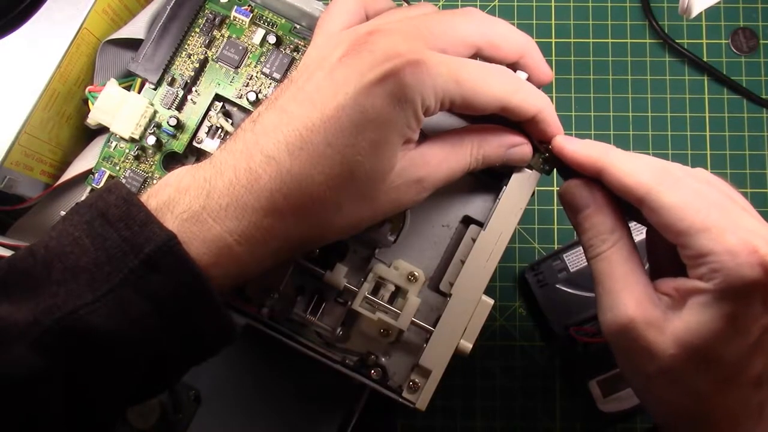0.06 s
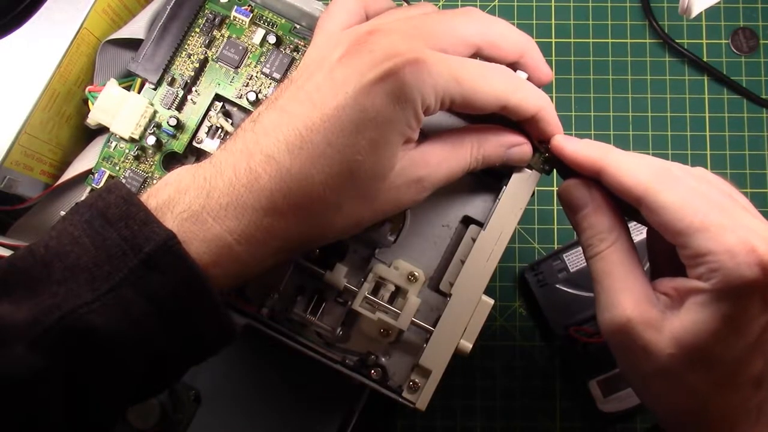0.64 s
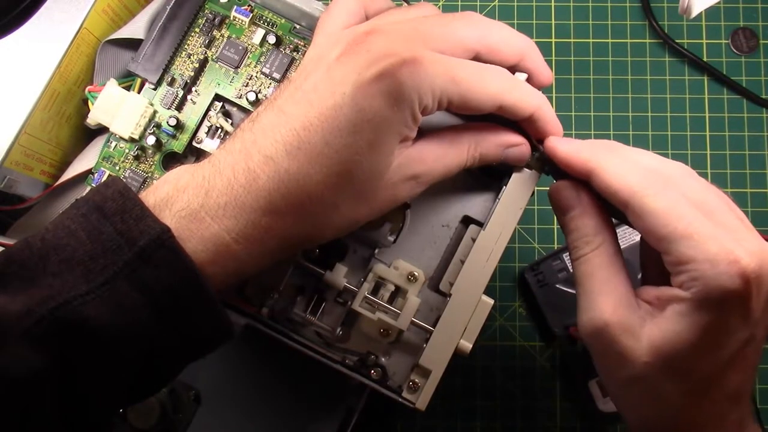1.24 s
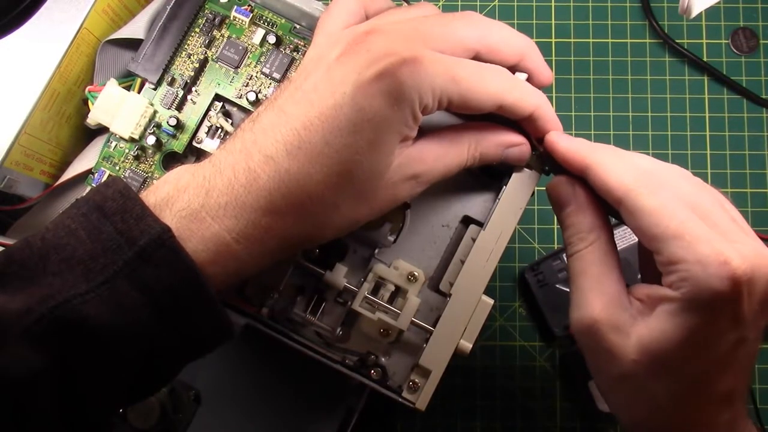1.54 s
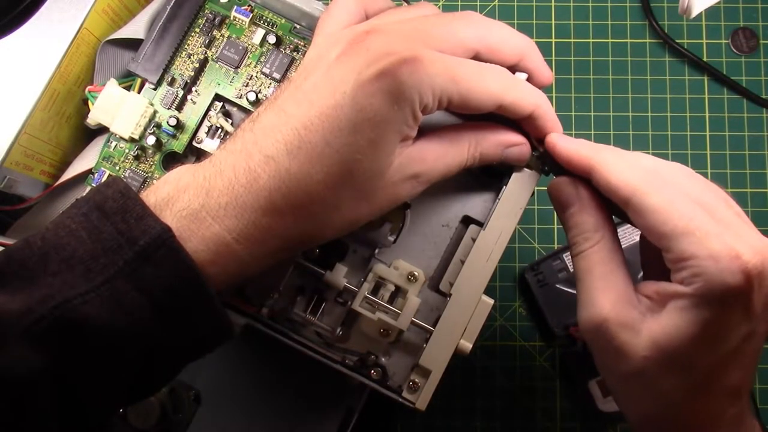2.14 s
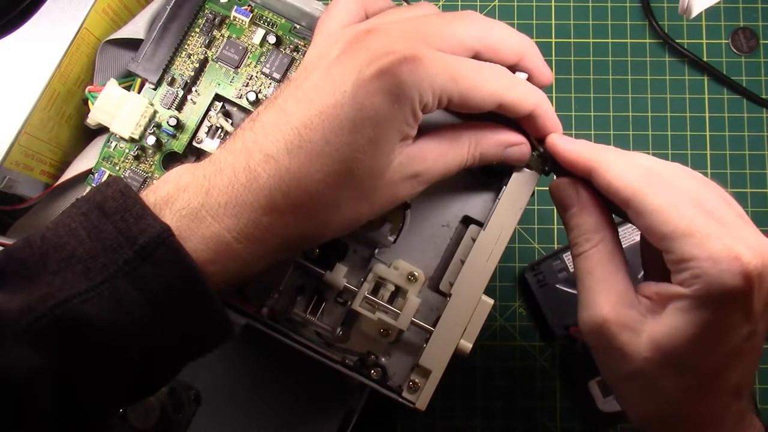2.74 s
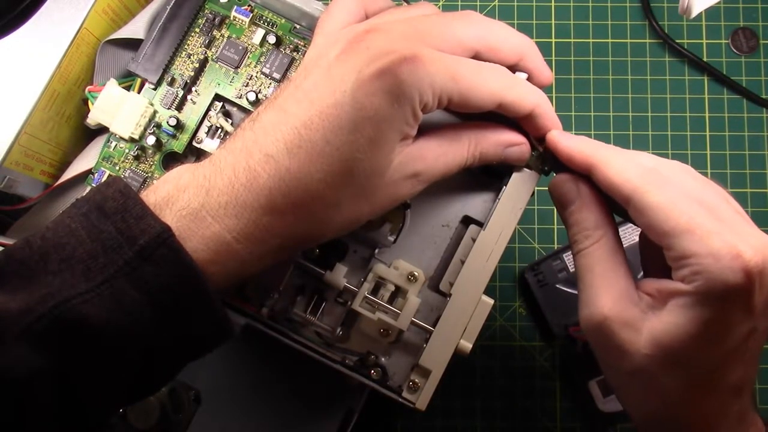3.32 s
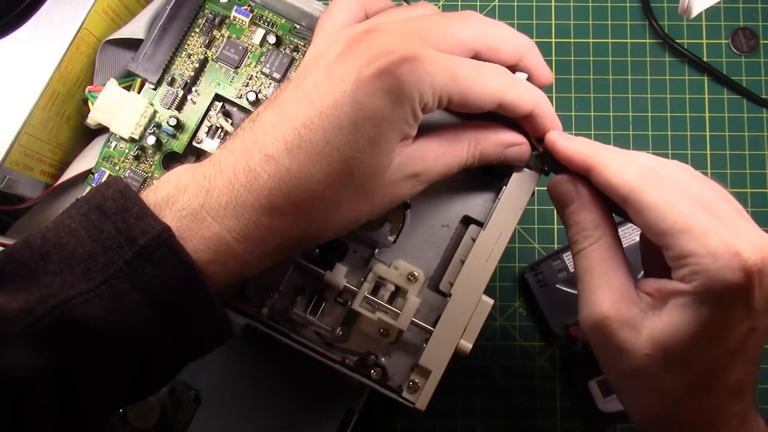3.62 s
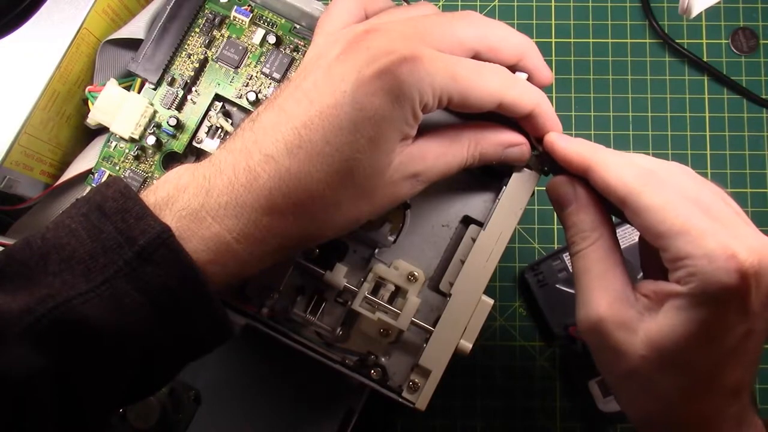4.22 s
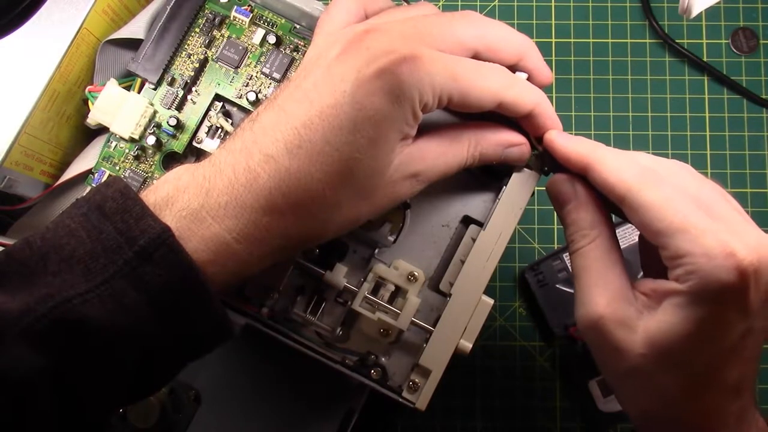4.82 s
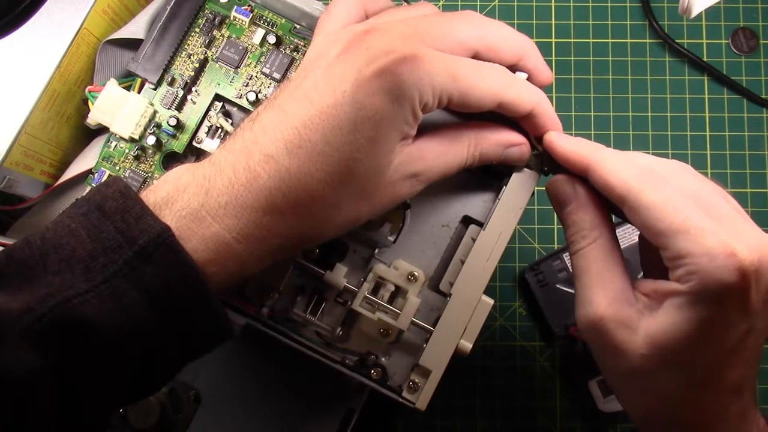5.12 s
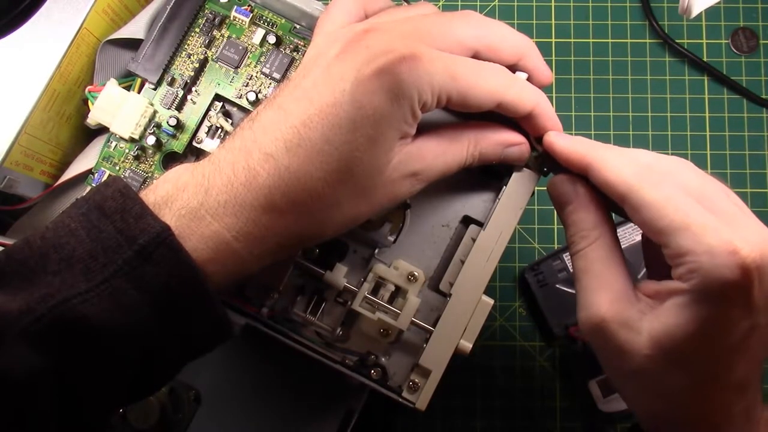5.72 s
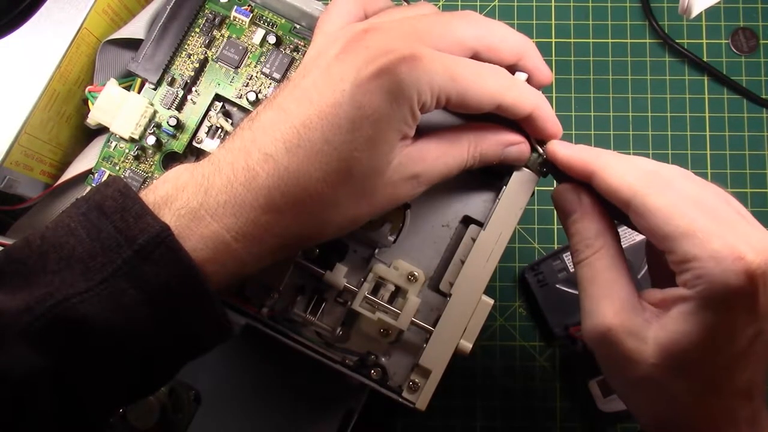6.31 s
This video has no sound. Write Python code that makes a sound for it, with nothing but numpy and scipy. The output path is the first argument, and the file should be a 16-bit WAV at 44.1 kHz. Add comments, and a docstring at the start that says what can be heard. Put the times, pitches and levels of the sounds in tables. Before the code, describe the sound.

From the start, a small metal tool scratches at solder on a circuit board, close to the microphone, at about four strokes a second. Each stroke is a short, gritty rasp with one or more sharp clicks as the tip catches and snaps free; tool and board ring very briefly in a small room. The scraping is firmest from about 1.2 to 3.9 seconds, with a short break in the rasps around 3.2 seconds, where two crisp snaps sound. From 4 seconds the rasps become lighter and the clicks stand out, thinning briefly near 5.7 seconds, with a last sharp snap at about 6.3 seconds. Soft room noise lies beneath throughout, dipping for an instant after most strokes. A faint low drone, like a vehicle outside, swells at about 1 second, sinks slightly in pitch and fades away between 3 and 4.5 seconds.

```python
"""Scratching a solder pad

A small metal tool scratches a circuit board close by, about four strokes a second. Its tip grinds
over the solder, catches and snaps free; tool, board and chassis ring briefly in a small room.
Soft room noise lies beneath, and a low drone swells and fades like a vehicle outside.
After most strokes all but the bass dips briefly."""
import sys
import numpy as np
from scipy import signal
from scipy.fft import rfft, irfft, next_fast_len
from scipy.io import wavfile
from scipy.ndimage import uniform_filter1d

SR = 44100
rng = np.random.default_rng(int(sys.argv[2]) if len(sys.argv) > 2 else 0)


def dump_mix(stems):
    """Bounce the given channels to the path in sys.argv[1] as a 16-bit WAV at rate SR."""
    frames = np.atleast_2d(stems).T  # one column per channel
    limited = np.clip(frames, -1, 1)  # hard clip at full scale
    pcm = np.round(limited * 32767).astype(np.int16)
    wavfile.write(sys.argv[1], SR, pcm)


N = 284886
TIME = np.arange(N) / SR


def from_db(db):
    """Decibels to gain."""
    return 10 ** (np.asarray(db) / 20)


def rms(x):
    """Root mean square."""
    return np.sqrt(np.mean(x ** 2) + 1e-20)


def curves(rows):
    """Breakpoint columns, interpolated to every sample."""
    time_s, *columns = np.transpose(rows)
    return [np.interp(TIME, time_s, column) for column in columns]


def add(out, start_s, x):
    """Mix x into out at start_s."""
    at = round(start_s * SR)
    x = x[max(0, -at):N - at]
    out[max(0, at):max(0, at) + len(x)] += x


def band(x, edges_hz, order):
    """Causal band-pass."""
    return signal.sosfilt(signal.butter(order, edges_hz, "band", fs=SR, output="sos"), x + 1e-18)


def coloured(x, spectrum):
    """Zero-phase EQ through (freq_hz, gain_db) points, log-frequency axis."""
    size = next_fast_len(len(x))
    freq_hz, gain_db = np.transpose(spectrum)
    bins_hz = np.maximum(np.fft.rfftfreq(size, 1 / SR), 1)
    gain = from_db(np.interp(np.log(bins_hz), np.log(freq_hz), gain_db))
    return irfft(rfft(x, size) * gain, size)[:len(x)]


def noise(spectrum, size=N):
    """Coloured noise, unit rms."""
    x = coloured(rng.standard_normal(size), spectrum)
    return x / rms(x)


def drift(rate_hz, size=N):
    """Random wander, spread about 1."""
    return np.interp(TIME[:size] * rate_hz, np.arange(4096), rng.standard_normal(4096))


# Room noise spectra, mid and side: freq_hz, density_db
AIR_MID_SPECTRUM = [(25, -14.5), (55, -8.5), (130, 0.5), (190, 0.5), (255, 1.5), (340, -3), (480, -3.5),
                    (700, -4), (1300, -5), (2400, -12), (3300, -15), (4600, -20), (9000, -24.5),
                    (15000, -34)]
AIR_SIDE_SPECTRUM = [(25, -4.5), (60, -13), (140, -1.5), (260, 2.5), (500, 1.5), (1200, -6), (2600, -10),
                     (5000, -14.5), (7000, -26), (15000, -47.5)]
# Room noise envelope, mid: time_s, level_db
AIR_ENVELOPE = [(0, -56), (2.7, -55), (4.5, -58), (6.46, -58.5)]


def room_noise(side_db=-67.5):
    """Soft diffuse noise, as mid and side."""
    mid_db, = curves(AIR_ENVELOPE)
    return from_db(mid_db) * noise(AIR_MID_SPECTRUM), from_db(side_db) * noise(AIR_SIDE_SPECTRUM)


# Rumble spectrum: freq_hz, density_db
RUMBLE_SPECTRUM = [(30, -25.5), (60, -3), (100, -3), (145, 1), (205, -6.5), (270, 6.5), (335, -4.5),
                   (420, -5), (600, -20.5), (1200, -12), (4000, -52.5)]
# Rumble envelope: time_s, level_db
RUMBLE_ENVELOPE = [(0, -65), (.7, -66), (1.15, -50.5), (1.8, -58), (2.55, -55), (3.0, -60), (4.5, -73.5),
                   (6.46, -80)]


def rumble():
    """Low noise of a distant vehicle, swelling and fading."""
    level_db, = curves(RUMBLE_ENVELOPE)
    return from_db(level_db) * noise(RUMBLE_SPECTRUM)


# Engine tones: time_s, pitch_hz, level_db
LOW_TONE = [(1.3, 102, -71), (1.7, 99.5, -52), (2.1, 96.2, -54.5), (2.4, 92.6, -59), (2.8, 93.4, -59.5),
            (3.0, 92, -68), (4.8, 91, -77)]
HIGH_TONE = [(1.0, 143.9, -71.5), (1.2, 142.1, -56), (1.7, 140.9, -56.5), (2.0, 138.7, -67),
             (6.46, 133.8, -78)]
# Third-harmonic resonances: centre_hz, half_width_hz, peak_db
RESONANCES = [(277.5, 2.26, 6), (427, 2.7, 2)]


def drone(tone, waver=0.02, flutter_db=3):
    """A wavering, sinking engine tone; its third harmonic glides through resonances."""
    pitch_hz, level_db = curves(tone)
    lift = sum(from_db(peak_db) / np.hypot(1, (3 * pitch_hz - centre_hz) / half_width_hz)
               for centre_hz, half_width_hz, peak_db in RESONANCES)
    phase = 2 * np.pi * np.cumsum(pitch_hz * (1 + waver * drift(24.76))) / SR
    first = from_db(level_db + flutter_db * drift(18)) * np.sin(phase)
    third = lift * from_db(level_db + flutter_db * drift(18)) * np.sin(3 * phase)
    return np.sqrt(2) * (first + third)


# Bands of chassis, board, tool, tip: low_hz, high_hz
BANDS_HZ = [(200, 700), (700, 1900), (1900, 5500), (5500, 17000)]
# Room response per band: early_db, tail_db, tail_t60_s, early_t60_s, first_s, blur_hz
BAND_ROOMS = [(-31.5, -0.5, 0.24, 0.1, 0.0032, 40), (-3.5, -6, 0.23, 0.036, 0.0045, 80),
              (-18, -9.5, 0.28, 0.014, .0025, 3900), (-16, -12, 0.25, 0.022, 0.0031, 1800)]


def room(x, early_db, tail_db, tail_t60_s, early_t60_s, first_s, blur_hz, size=16384):
    """Direct sound, quick reflections off bench and chassis, and a diffuse tail of like colour."""
    t = TIME[:size]
    spectrum = rfft(x, size)
    early = rng.standard_normal(size) * np.clip(t / first_s - 1, 0, 1) * from_db(-60 * t / early_t60_s)
    near = irfft(spectrum * (1 + from_db(early_db) * rfft(early / np.linalg.norm(early))))
    # Stored energy leaks away as hiss.
    retention = from_db(-60 / (tail_t60_s * SR)) ** 2
    energy = signal.lfilter([0, 1 - retention], [1, -retention], np.pad(x, (0, size - len(x))) ** 2)
    blur_bins = max(1, round(blur_hz * size / SR))
    colour = np.sqrt(np.abs(uniform_filter1d(np.abs(spectrum) ** 2, blur_bins)))
    hiss = irfft(colour * rfft(rng.standard_normal(size)))
    return near + from_db(tail_db) * np.sqrt(energy) * hiss / rms(hiss)


# Modes of tool, board and chassis: freq_hz, gain_db, t60_s
BODY_MODES = [(240, -28.5, 0.21), (344, -28, .14), (399, -29, 0.094), (461, -9.5, 0.073),
              (495.4, -13.5, 0.096), (618.5, -16.5, 0.14), (755, -22, 0.16), (926, -11.5, 0.054),
              (1047.5, -2.5, 0.047), (1104, -2, 0.044), (1164, 0.5, 0.023), (1366, -12.5, 0.1),
              (1515, -8, .05), (1868, -6.5, 0.025), (2322, -11, 0.11), (2787, 4.5, 0.015),
              (3406, 2.5, 0.026), (3746, -10.5, 0.048), (4018, 8, 0.0081), (4710, -9.5, 0.042),
              (6910, -7.5, 0.0095), (7510, -10, 0.016), (8670, -20, 0.0033)]
# The tool's ping, a close mode pair: freq_hz, gain_db, t60_s
PING_MODES = [(2902, 4.5, 0.012), (3035, -8.5, 0.011)]


def ring(modes, vary_db, size=6000):
    """Struck modes: damped sines of random strength and sign."""
    t = TIME[:size]
    freq_hz, gain_db, t60_s = np.transpose(modes)[:, :, None]
    strength = from_db(gain_db + vary_db * rng.standard_normal(freq_hz.shape))
    strength *= rng.choice([-1, 1], freq_hz.shape)
    return np.sum(strength * np.sin(2 * np.pi * freq_hz * t) * from_db(-60 * t / t60_s), axis=0)


# Dense vibration between the modes: freq_hz, density_db
CRACK_SPECTRUM = [(200, -21), (500, -2.5), (1200, 12), (2000, -1.5), (3600, 14), (4300, 6.5), (5200, 2),
                  (7300, -1), (10500, -4), (13000, -7), (16000, -20.5)]


def body(modes, crack_db, crack_t60_s, vary_db, size=6000):
    """Response to one contact: ringing modes plus a short crack."""
    envelope = from_db(crack_db - 60 * TIME[:size] / crack_t60_s)
    return ring(modes, vary_db, size) + envelope * noise(CRACK_SPECTRUM, size)


# Pushes over the solder: peak_s, rise_s, level_db, dip_db
PUSHES = [(-.01, 0.077, -47.5, 20), (.235, .04, -50.5, 0.5), (.49, 0.05, -50.5, 3.5), (.562, 0.014, -41, 0),
          (.785, 0.042, -46.5, 16.5), (1.004, 0.013, -42, 13), (1.256, 0.01, -32.5, 15),
          (1.467, 0.028, -45, 15), (1.68, 0.018, -35.5, 9), (1.93, 0.026, -41, 14),
          (2.16, 0.018, -42.5, 8.5), (2.38, 0.035, -49, 13), (2.588, 0.023, -44, 7.5),
          (2.802, 0.032, -43.5, 13), (3.025, 0.033, -44.5, 11), (3.609, 0.027, -41.5, 14.5),
          (3.86, 0.013, -35, -2), (4.094, 0.061, -59.5, 16), (4.31, 0.031, -49.5, 15),
          (4.519, 0.032, -58, 7.5), (4.726, 0.026, -46, 4), (4.951, .04, -50, 0), (5.207, 0.023, -49, 16),
          (5.415, 0.025, -48, 14), (5.901, 0.014, -62, 13), (6.125, 0.027, -53, 14),
          (6.331, 0.03, -65, 17.5)]


def scrapes(grains_per_s=5000, spread_db=3.5, judder_db=5.5, fall_ratio=0.99, size=9000):
    """The tip trips over tiny bumps in the solder; each clicks into the same body."""
    out = np.zeros(N)
    lag_s = TIME[:size] - size / SR / 2
    for peak_s, rise_s, tool_db, _ in PUSHES:
        board_db = tool_db - 3
        chassis_db = board_db - 9
        tip_db = tool_db - 10 + 0.42 * (tool_db + 44)  # harder is brighter
        levels_db = [chassis_db, board_db, tool_db, tip_db]
        push = np.exp(-(lag_s / np.where(lag_s < 0, rise_s, fall_ratio * rise_s)) ** 2)
        bumps = from_db(spread_db * np.minimum(rng.exponential(1, size), 4)) * rng.choice([-1, 1], size)
        judder = from_db(judder_db * drift(300, size))
        grains = push * judder * bumps * (rng.random(size) < grains_per_s / SR)
        response = body(BODY_MODES + PING_MODES, crack_db=4, crack_t60_s=0.005, vary_db=1.8)
        rasp = coloured(signal.fftconvolve(grains, response), [(7000, 0.0413), (12000, -3)])
        for edges_hz, level_db, walls in zip(BANDS_HZ, levels_db, BAND_ROOMS):
            part = band(rasp, edges_hz, order=5)
            part *= from_db(level_db) * np.linalg.norm(push) / np.linalg.norm(part)
            add(out, peak_s + lag_s[0], room(part, *walls))
    return out


def dips(x, delay_s=0.0942, sink_s=0.0081, recover_s=0.016, above_hz=220, leak=0.022):
    """All but the bass sinks briefly after most pushes."""
    depth_db = np.zeros(N)
    for peak_s, _, _, dip_db in PUSHES:
        lag_s = TIME - peak_s - delay_s
        depth_db += dip_db * np.exp(-(lag_s / np.where(lag_s < 0, sink_s, recover_s)) ** 2)
    bass = signal.sosfiltfilt(signal.butter(2, above_hz, fs=SR, output="sos"), x)
    return bass + (x - bass) * (leak + (1 - leak) * from_db(-depth_db))


def catches(offset_db=-10, knock_db=-19, tick_db=-3.5, centre_hz=8300):
    """The tip trips once more as each push eases: one random lesser snap per push."""
    rows = []
    for peak_s, _, push_db, _ in PUSHES:
        start_s = peak_s + abs(rng.normal(0, 0.022))
        level_db = push_db + rng.normal(offset_db, 3.5)
        tick_hz = centre_hz * 2 ** rng.normal(0, 0.25)
        rows.append((start_s, level_db, knock_db, tick_db, tick_hz))
    return rows


def stick_slip(size, creep_db=-28, creep_s=0.0013, slip_db=-20, slip_s=0.0017):
    """Tip force: rising creep, a jolt at sample `size`, then a flurry of slips."""
    t = TIME[:size]
    creep = from_db(creep_db) * np.exp(-t[::-1] / creep_s)
    slips = from_db(slip_db) * np.exp(-t / slip_s)
    force = np.concatenate([creep, slips]) * rng.standard_normal(2 * size)
    force[size] += 1
    return force


def tick(force, centre_hz, tail_db=-20, decay_s=0.0043, focus_db=12):
    """The tool's point answers the force with a short, bright tick."""
    jolt = len(force) // 2
    tail = from_db(tail_db) * np.exp(-TIME[:3 * jolt] / decay_s) * rng.standard_normal(3 * jolt)
    burst = np.pad(force, (0, 2 * jolt))
    burst[jolt:] += tail
    treble_hz = np.geomspace(4000, 17000, 9)
    gain_db = -focus_db * np.log2(treble_hz / centre_hz) ** 2
    return coloured(coloured(burst, CRACK_SPECTRUM), np.c_[treble_hz, gain_db])


# Ping level relative to its snap: snap_db, share_db
PING_SHARES = [(-44.5, -11), (-29, -4.5), (-33, -1)]


def ping(snap_db, rms_samples):
    """The tool's mode pair rings into the room; harder snaps give it a larger share."""
    level_db = snap_db + np.interp(snap_db, *np.transpose(PING_SHARES))
    tone = band(ring(PING_MODES, vary_db=5), BANDS_HZ[2], order=1)
    tone *= from_db(level_db) / rms(tone[:rms_samples])
    return room(tone, early_db=-13, tail_db=-10.5, tail_t60_s=0.27, early_t60_s=0.05,
                first_s=0.0025, blur_hz=120)


# Tip releases, knock and tick relative to level: start_s, level_db, knock_db, tick_db, tick_hz
RELEASES = [(0.135, -51.5, -6, -18, 8080), (.1907, -33.5, -35, -9, 7150), (0.2472, -33, -19, -8, 6660),
            (.4426, -40, -19, -7, 10400), (.5359, -31.5, -18, -12.5, 7400), (.5454, -33, -23, -8.5, 8900),
            (0.7938, -33, -34, -0.5, 9820), (0.8071, -33.5, -16.5, -11, 6800),
            (1.2172, -30.5, -27, -13.5, 8800), (1.245, -46, -18, 8, 7300),
            (1.4276, -41.5, -12.5, -11, 6400), (1.4509, -26, -15, 3, 9250), (1.686, -44.5, -12, 9, 8150),
            (1.6995, -42, -8, -3, 9000), (1.723, -45, -20, 1, 6660), (1.9293, -32.5, -24, -1, 5900),
            (1.9431, -37, -15, -2, 9500), (2.1483, -34.5, -23.5, -14, 6500),
            (2.1744, -35.5, -7.5, -5, 8500), (2.366, -38.5, -17, -12.5, 7900),
            (2.3984, -37.5, -11.5, -15, 9550), (2.7827, -32.5, -24.5, -10.5, 9600),
            (3.0061, -33, -14, -5, 12600), (3.0466, -40.5, -18, -23, 7600),
            (3.2246, -25.5, -14.5, -6.5, 11800), (3.2552, -27.5, -12, -7.5, 7500),
            (3.4788, -45.5, -24, -3, 7200), (3.58, -34.5, -25, -12.5, 6600), (3.5939, -34.5, -20, -5, 7600),
            (3.8306, -37.5, -22, -19, 7290), (3.8623, -26, -11, -5, 9100), (4.0932, -37, -2.5, -1.5, 7600),
            (4.3066, -33.5, -33, -12, 7200), (4.328, -31.5, -22, -4, 9100), (4.5191, -31, -8.5, -1.5, 9300),
            (4.7264, -26, -13.5, -3.5, 10700), (4.769, -46, -14, 2, 7100), (4.9637, -37, -22, -17, 7900),
            (4.9835, -32, -14, 5.5, 9800), (5.2159, -34.5, -7.5, -8.5, 8460), (5.2604, -50, -18, 4.5, 7370),
            (5.41, -37.5, -12.5, -15, 11470), (5.4287, -41, -5.5, -14, 7550),
            (5.6287, -36.5, -12.5, -13.5, 7500), (5.7073, -49, -31, 2, 7900), (5.898, -30, -14, -4, 8300),
            (6.1059, -31.5, -13, -1.5, 8600), (6.3331, -25, -15.5, -13, 8300)]


def snaps(board_db=-1.3, board_follow=0.28, tool_db=-3, size=441):
    """The tip snaps free: the chassis knocks, board and tool ring, the point ticks."""
    out = np.zeros(N)
    for start_s, level_db, knock_db, tick_db, tick_hz in RELEASES + catches():
        shares_db = [knock_db, board_db + board_follow * knock_db, tool_db, tick_db]
        force = stick_slip(size)
        hit = signal.fftconvolve(body(BODY_MODES, crack_db=5, crack_t60_s=0.04, vary_db=1.5), force)
        sources = [hit, hit, hit, tick(force, tick_hz)]
        for source, edges_hz, share_db, walls in zip(sources, BANDS_HZ, shares_db, BAND_ROOMS):
            part = band(source, edges_hz, order=4)
            part *= from_db(level_db + share_db) / rms(part[size:2 * size])
            add(out, start_s - size / SR, room(part, *walls))
        add(out, start_s, ping(level_db, size))
    return out


# The tool's left-right difference: freq_hz, gain_db
TOOL_SIDE_SPECTRUM = [(100, -11.5), (400, -41), (1200, -42.5), (2800, -37), (5500, -16), (10000, -22.5),
                      (15000, -15)]


def scene():
    """The tool reaches a close microphone pair almost alike, differing in phase; the air is wider."""
    tool = snaps() + scrapes()
    air_mid, air_side = room_noise()
    vehicle = rumble() + drone(LOW_TONE) + drone(HIGH_TONE)
    quadrature = np.imag(signal.hilbert(tool, next_fast_len(N)))[:N]
    mid = dips(air_mid + vehicle + tool)
    side = dips(air_side + coloured(quadrature, TOOL_SIDE_SPECTRUM))
    return np.array([mid + side, mid - side])


def record(dry):
    """Steep low-pass."""
    cutoff_hz = 16200
    return signal.sosfilt(signal.ellip(10, 0.1, 80, cutoff_hz, fs=SR, output="sos"), dry)


dry = scene()
out = record(dry)
dump_mix(out)
```